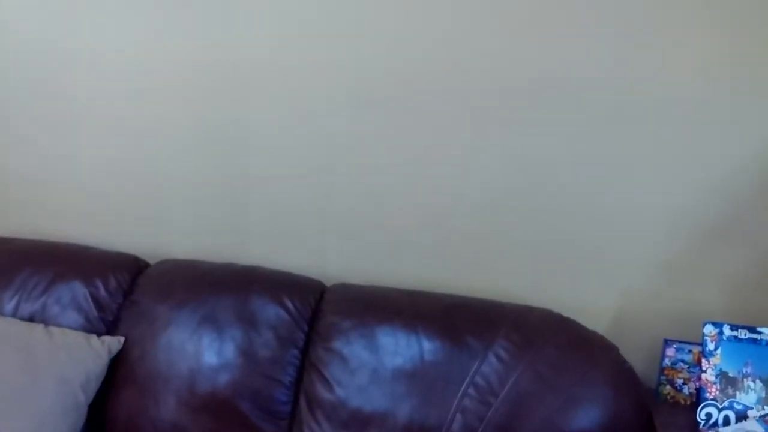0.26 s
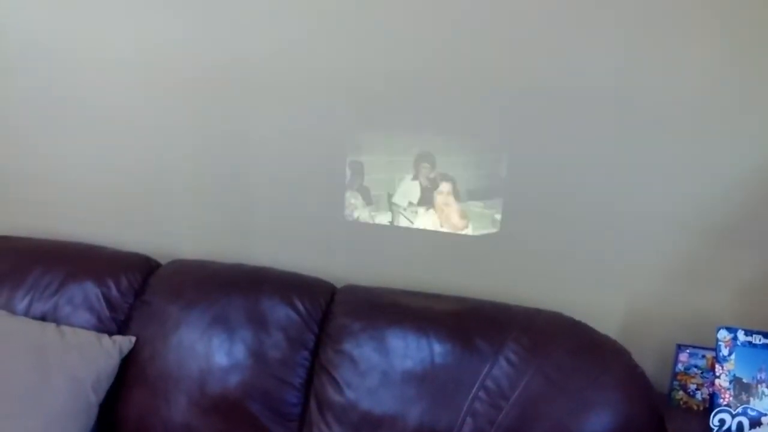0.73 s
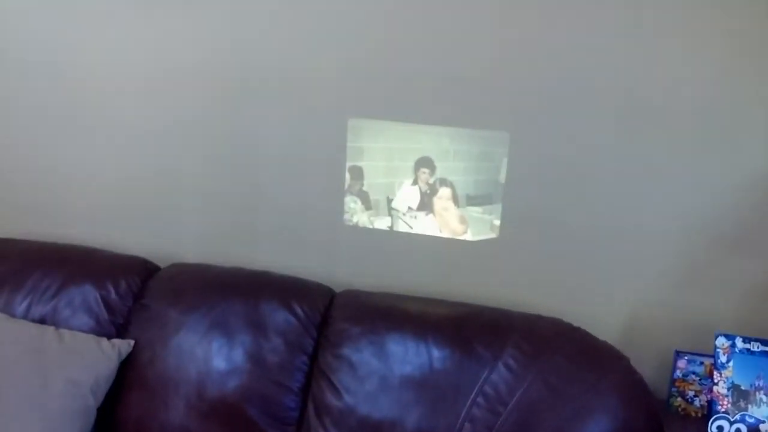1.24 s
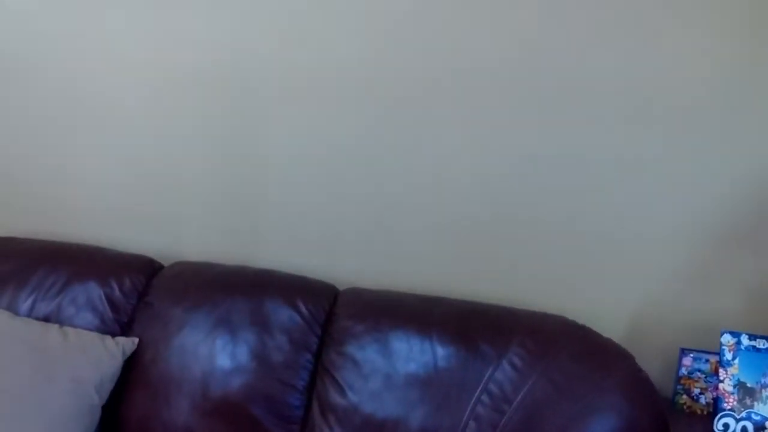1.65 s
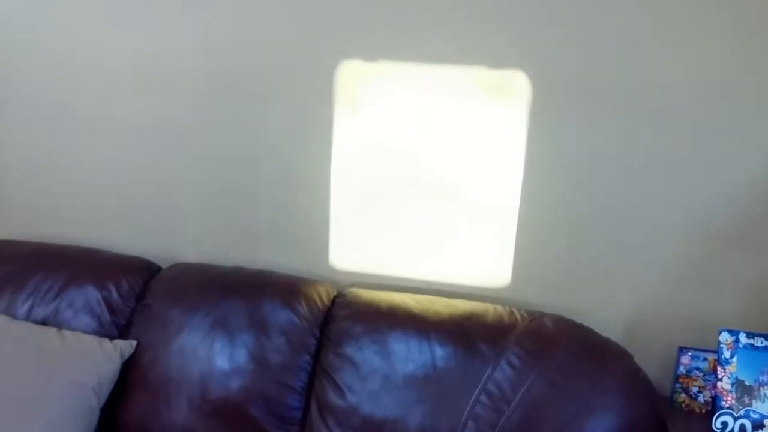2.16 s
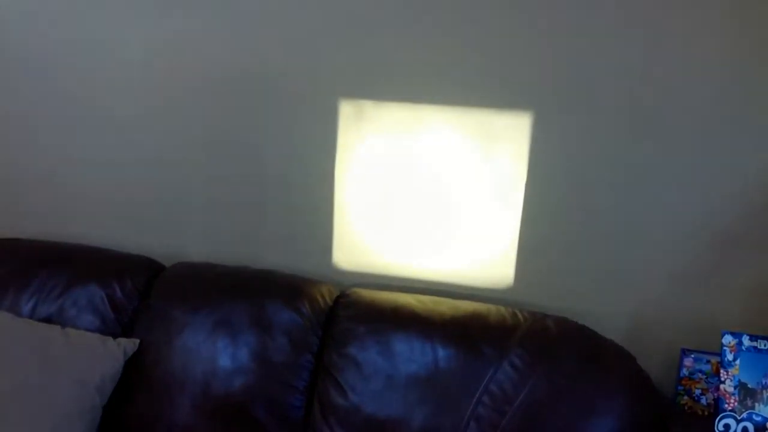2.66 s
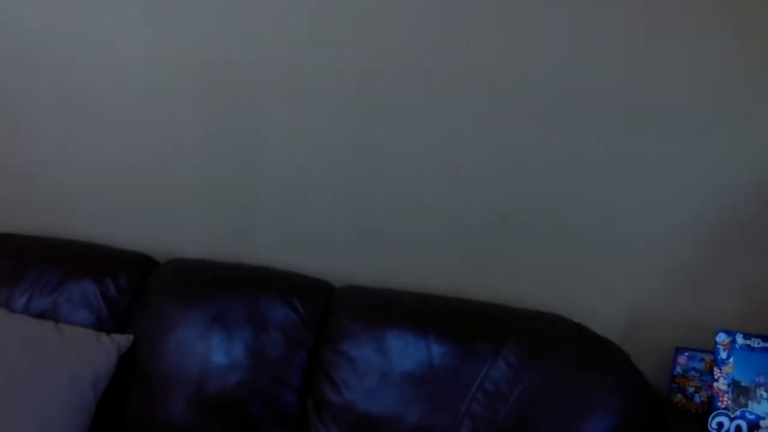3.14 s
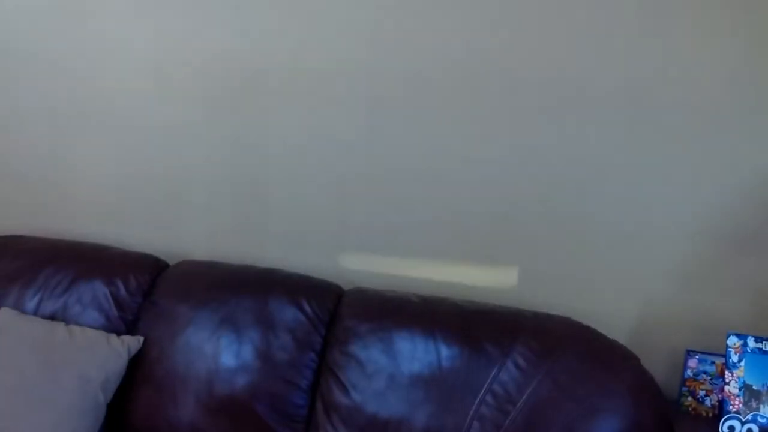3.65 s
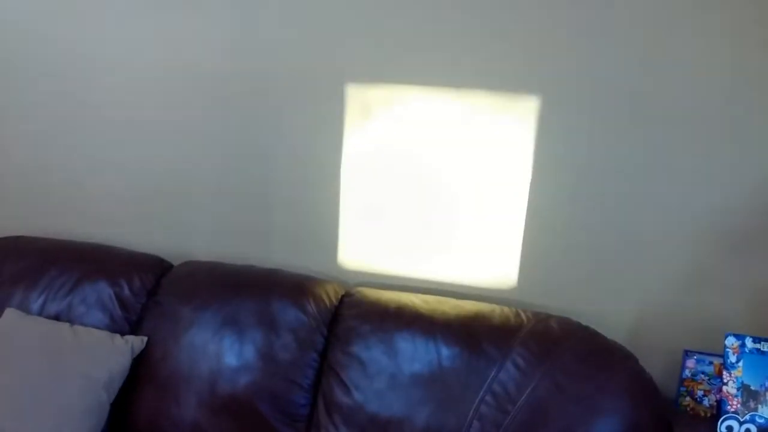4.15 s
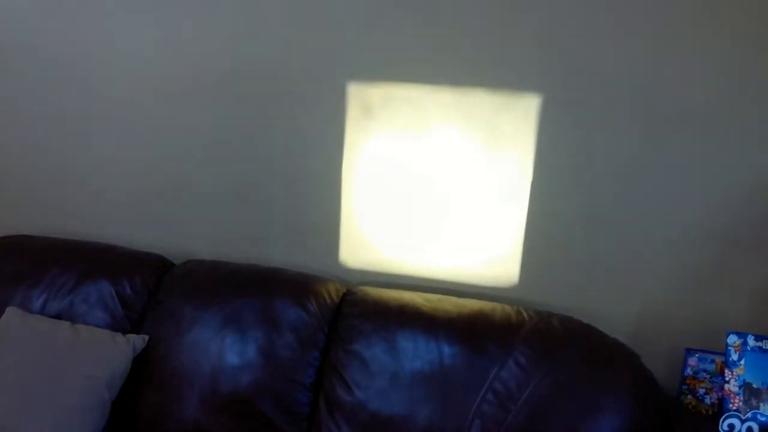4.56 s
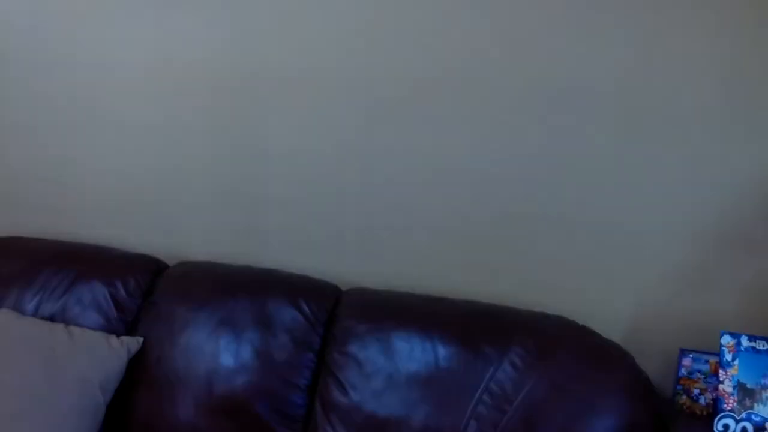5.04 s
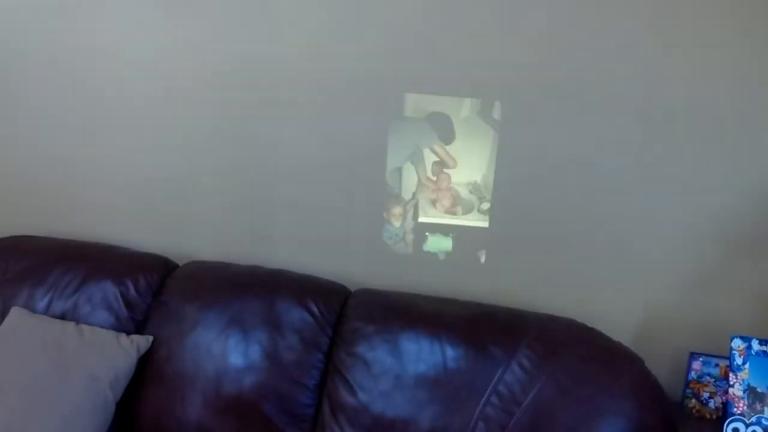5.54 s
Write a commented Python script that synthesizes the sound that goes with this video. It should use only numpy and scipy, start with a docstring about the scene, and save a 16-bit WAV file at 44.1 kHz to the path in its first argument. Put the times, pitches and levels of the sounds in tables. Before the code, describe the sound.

A slide projector works close to a hand-held stereo recorder in a living room, stronger on the left. Its fan rushes steadily, with a faint rapid scuff from the rotor and a low, slightly wavering electrical hum. At about 0.07 seconds a sharp snap starts the first change: metal levers clack and rattle, plastic housing knocks, gears rustle, a slide lands around 0.8, and a soft thud ends it near 1.0. A second cycle starts at 1.4 with the heaviest jolt and a low boom, ending around 2.3. After a pause of fan noise, a third similar clatter runs from 3.0 to 3.95, with a tiny squeak near 3.2. The fourth runs from 4.8 to 5.7, with small woody knocks of loose mounts at 5.4 to 5.6. Then only fan and hum remain. Short, diffuse room echoes surround the bright, dry clacks.

```python
"""Tray slide projector in a living room

A projector close to a hand-held recorder runs four changes, the middle two without a slide. In each, one cam jolts
the stand, runs the gears, works the same levers in order and ends in a soft thud; loose parts keep their own time.
Noise bursts through broad spectra and ringing modes make the clacks; sines make the hum, filtered noise the fan.
Shifting echoes add the room, and the microphones round off the loudest peaks."""
import sys
import numpy as np
from scipy import signal
from scipy.fft import rfft, irfft
from scipy.io import wavfile
from scipy.ndimage import uniform_filter1d

SR = 44100
rng = np.random.default_rng(int(sys.argv[2]) if len(sys.argv) > 2 else 0)


def store_wav(level_fs):
    """Save 16-bit WAV to argv[1]."""
    pcm = np.round(np.clip(np.atleast_2d(level_fs), -1, 1) * 32767)
    wavfile.write(sys.argv[1], SR, pcm.T.astype(np.int16))


N = 255780
T = np.arange(N) / SR

# All levels are relative: each layer's own gain and the microphones follow.
# broad colour of the thin metal levers: f/Hz, level/dB per Hz
METAL_SPECTRUM = [(40, -28), (300, -25), (1000, -5.5), (3000, 0), (4300, -5.5), (5600, -0.5), (8000, -1),
                  (12000, 2.5), (16000, -7.5)]
# broad colour of the plastic housing: f/Hz, level/dB per Hz
HOUSING_SPECTRUM = [(40, -41), (200, -32.5), (450, -5.5), (800, -16), (1300, 7), (1800, 2.5), (2700, 0),
                    (3400, -11.5), (4500, -15.5), (9000, -14)]
# clear modes of the housing: f/Hz, level/dB, t60/s
HOUSING_MODES = [(823, 15, 0.094), (997, 10.5, 0.09), (1196.5, 13.5, 0.12), (1478, 11.5, 0.11),
                 (1860, -37, 0.15), (2366, -44, 0.052), (2350, -10, .05), (2710, -30, 0.029),
                 (3140, -15, 0.087)]
# broad colour of the heavy base: f/Hz, level/dB per Hz
BASE_SPECTRUM = [(40, -30), (130, -8.5), (280, -26), (410, 10.5), (600, 1.5), (900, 4), (2000, -39)]
# clear modes of the base: f/Hz, level/dB, t60/s
BASE_MODES = [(378, -11.5, 0.15), (453, -1, 0.22), (466, 4.5, 0.27), (534, -14, .06), (682, -0.5, 0.16)]
# followers and pawls tick over the cam's lobes: t/s of cam travel, metal level/dB, housing level/dB
CAM_TICKS = [(.063, -6, -40), (.171, -11.5, -64), (.186, -15, -22), (.251, -13, -25.5), (.4372, -7.5, -36),
             (.454, -8, -21), (.6825, -18, -17), (.693, -6.5, -22), (.8105, -9.5, -30), (.94, -19, -32)]
BASE_LAG_S = 0.00494


def mechanism():
    """Clacks and ticks excite thin metal levers, the plastic housing and, a moment later, the heavy base."""
    clacks, ticks = heavy_blows(), on_cam(CAM_TICKS)

    metal = undb(-8.0) * place((s, undb(db) * clatter(t60)) for s, db, _, _, t60 in clacks)
    metal += undb(-12.5) * place((s, undb(db) * blow(t60=0.031, crack_db=-30)) for s, db, _ in ticks)

    # the larger parts take a few milliseconds to build up
    housing = undb(4.0) * place(
        (s, undb(db) * (1 - fade(0.013)) * blow(1.32 * t60, crack_db=-22)) for s, _, db, _, t60 in clacks)
    housing += undb(-6.5) * place((s, undb(db) * blow(t60=0.061, crack_db=-32)) for s, _, db in ticks)
    base = undb(6) * place(
        (s + BASE_LAG_S, undb(db) * (1 - fade(0.018)) * blow(t60=0.082, crack_db=-22))
        for s, _, _, db, _ in clacks)

    clack = through(metal, unit(colour(METAL_SPECTRUM)))
    clatter_of_housing = body(housing, HOUSING_SPECTRUM, HOUSING_MODES, modes_db=-6.5)
    clunk = body(base, BASE_SPECTRUM, BASE_MODES, modes_db=-5)
    return clack + clatter_of_housing + clunk


# one turn of the cam each: t/s, clutch slip before the cam turns/s, pawl snap level/dB,
# starting jolt level/dB, cam force level/dB, closing thud level/dB
CYCLES = [(0.0684, 0.0047, -4.5, -1.5, -0.5, -21.5), (1.3707, 0.0087, -2, 6, 0, -19.5),
          (3.0007, 0.00078, -5, -1.5, 0, -21), (4.7703, 0.0081, -0.5, -4, -0.5, -23.5)]
# whether each cycle brings a slide into the gate: true or false
HAS_SLIDE = [True, False, False, True]
# the clutch bites, then the lifter kicks: t/s after the start, metal level/dB, housing level/dB,
# base level/dB before the jolt is added, chatter t60/s
START_CLACKS = [(0, -7, -25, -33, 0.057), (.0088, 2.5, -19.5, -30, 0.087)]
# the cam throws the index lever, stops the tray and opens the shutter; the cycle's force is added:
# t/s of cam travel, metal level/dB, housing level/dB, base level/dB, chatter t60/s
CAM_CLACKS = [(.3286, -3, -29, -53, 0.12), (.4708, -7.5, -20, -33.5, 0.071), (.79, -9, -23, -45, 0.023)]
# the gate clamp closes on a slide (row 0) or on nothing (row 1); the cycle's force is added:
# metal level/dB, housing level/dB, base level/dB, chatter t60/s
CLAMP_BLOWS = [(-12, -26.5, -52, 0.092), (-1.5, -27.5, -52, 0.1)]
# the loose tray lurches or a slide drops in its own time:
# t/s, metal level/dB, housing level/dB, base level/dB, chatter t60/s
LOOSE_CLACKS = [(0.2738, -2.5, -19, -27, 0.084), (0.7624, -4, -18.5, -53, 0.046),
                (1.5925, -1.5, -16.5, -40, 0.085), (3.2751, -3, -21, -30.5, 0.095),
                (3.2964, -8, -39, -56, .04), (4.8484, -1.5, -22, -34, 0.1), (4.8566, -4.5, -21, -46, .071)]
# cam travel at which the clamp closes: earlier on a slide, later on nothing
CLAMP_FULL_S, CLAMP_EMPTY_S = .7468, .7524


def heavy_blows():
    """Gather all clacks: the jolt drives the base at each start, the cam's force its levers and the clamp."""
    rows = list(LOOSE_CLACKS)
    for (start, slip, _, jolt_db, force_db, _), has_slide in zip(CYCLES, HAS_SLIDE):
        clamp = (CLAMP_FULL_S, *CLAMP_BLOWS[0]) if has_slide else (CLAMP_EMPTY_S, *CLAMP_BLOWS[1])
        for s, metal, housing, base, t60 in START_CLACKS:
            rows.append((start + s, metal, housing, base + jolt_db, t60))
        for s, metal, housing, base, t60 in [*CAM_CLACKS, clamp]:
            rows.append((start + slip + s, metal + force_db, housing + force_db, base + force_db, t60))
    return rows


def at_start(rows):
    """Repeat rows in every cycle, timed from the moment the clutch engages."""
    return [(start + s, *rest) for start, *_ in CYCLES for s, *rest in rows]


def on_cam(rows):
    """Repeat rows in every cycle, timed from the moment the cam begins to turn."""
    return [(start + slip + s, *rest) for start, slip, *_ in CYCLES for s, *rest in rows]


def clatter(t60):
    """A lever strikes and rebounds unevenly, each time with a fresh short crack over its ringing."""
    delays = np.cumsum(.003 + .008 * rng.random(6))
    sizes = undb(2 * rng.standard_normal(6) - 60 * delays / (0.74 * t60))

    def crack():
        return blow(t60=0.018, crack_db=-36)

    rebounds = place((s, size * crack()) for s, size in zip(delays, sizes))[:SR // 2]
    first = undb(1.5) * crack()
    return undb(-2.0) * blow(t60, crack_db=-18) + first + rebounds


# padded knock as the clutch drops out: f/Hz, level/dB, t60/s
CLUTCH_MODES = [(434, -6.5, 0.075), (490, -2.5, 0.048), (593, -5, 0.055), (1010, -8.5, 0.028),
                (2050, -4, 0.015), (2950, 5.5, 0.0084), (3125, 4, 0.012)]
THUD_S = .9495  # cam travel


def clutch():
    """A pawl lifts and snaps in to start the cycle, which ends with a padded knock and a small click."""
    snaps = place((s, undb(db) * blow(t60=0.008, crack_db=-13)) for s, _, db, *_ in CYCLES)
    lifts = place((s - .011, undb(db - 32.5) * blow(t60=0.072, crack_db=-33)) for s, _, db, *_ in CYCLES)

    def thud():
        return ring(CLUTCH_MODES) + undb(-5.0) * blow(t60=0.046, crack_db=-18)

    thuds = place((s + slip + THUD_S, undb(db) * thud()) for s, slip, *_, db in CYCLES)
    return through(snaps + lifts, unit(colour(METAL_SPECTRUM))) + thuds


# a slide lands hard in the gate: t/s, level/dB
LANDINGS = [(0.763, -4.5)]
# ringing of the gate: f/Hz, level/dB, t60/s
GATE_MODES = [(790, -13, .14), (1440, -9, .06), (1840, -5, .04), (2268, 0, .08), (2370, -11, .04)]


def gate():
    """A dropping slide sets the gate's damped modes ringing, with a soft onset."""
    return place((s, undb(db) * (1 - fade(.02)) * ring(GATE_MODES)) for s, db in LANDINGS)


# the mount is jogged as the pawl lifts: t/s after the start, f/Hz, level/dB
START_KNOCKS = [(-.006, 1700, -19)]
# the tray is nudged home, then the lifter bottoms in the gate: t/s of cam travel, f/Hz, level/dB
CAM_KNOCKS = [(.4535, 1620, -27), (.6815, 1442, -18.5)]
# loose mounts knock in the tray and gate: t/s, f/Hz, level/dB
LOOSE_KNOCKS = [(1.589, 1820, -22.5), (5.408, 1680, -16), (5.448, 2180, -23), (5.566, 1627, -18)]


def knocks():
    """A mount rings briefly in two modes while its edges buzz against their neighbours."""
    def knock(hz):
        buzz = resonate(blow(t60=0.08, crack_db=-23), hz, width_hz=310)
        woody = ring([(hz, 0, .04), (1.22 * hz, -3, .04)])
        return woody + undb(10.0) * buzz

    rows = at_start(START_KNOCKS) + on_cam(CAM_KNOCKS) + list(LOOSE_KNOCKS)
    return place((s, undb(db) * knock(hz)) for s, hz, db in rows)


# the index lever squeaks on its way out: t/s of cam travel, f/Hz, level/dB, length/s
CAM_SQUEAKS = [(.254, 2595, -24, 0.017)]
# stray squeaks of dry parts: t/s, f/Hz, level/dB, length/s
STRAY_SQUEAKS = [(0.861, 758, -31.5, 0.048), (3.184, 2860, -29, .014), (4.143, 1397, -39.5, 0.13),
                 (4.549, 1866, -44, 0.079)]
SWISH_S, SWISH_DB = .631, -28.5  # cam travel and level as the lifter slides down its guide


def rubbing():
    """The lifter hisses softly along its guide; dry bearings and levers squeak."""
    def brush():
        return (1 - fade(.05)) * blow(t60=.07, crack_db=-30)

    strokes = place((s, undb(db) * brush()) for s, db in on_cam([(SWISH_S, SWISH_DB)]))
    spectrum = [(1000, -27), (5000, -20.5), (8800, -6.5), (9900, 3), (11000, -12), (16000, -9.0)]
    hiss = undb(9) * through(strokes, unit(colour(spectrum)))

    rows = on_cam(CAM_SQUEAKS) + list(STRAY_SQUEAKS)
    squeaks = place((s, undb(db) * squeak(hz, length_s)) for s, hz, db, length_s in rows)
    return hiss + squeaks


def squeak(hz, length_s):
    """Uneven stick and slip: a rough tone that swells and dies."""
    n = max(int(length_s * SR), 2)
    pitch = hz * (1 + .08 * waver(N, rate_hz=1100)[:n])
    roughness = 1 + 0.55 * waver(N, rate_hz=190)[:n]
    return np.hanning(n) * roughness * np.sin(2 * np.pi * np.cumsum(pitch) / SR)


# load on the gears through one cycle: t/share of the cycle, level/dB
GEAR_LOAD = [(0, -74), (.15, -38.5), (.3, -38.5), (.45, -43.5), (.58, -42.5), (.8, -44.5), (1, -40.5)]
# broad colour of the rustle: f/Hz, level/dB per Hz
GEAR_SPECTRUM = [(100, -17), (300, -5.5), (450, 1.5), (900, 6.5), (1700, 9), (2800, 1.5), (4200, -14),
                 (7000, -3), (10000, -2), (16000, -4)]
CYCLE_S = 0.95


def gears():
    """Gears and sliding tray rustle with dense small contacts for as long as a cycle runs."""
    share, db = np.transpose(GEAR_LOAD)
    load = sum(np.interp((T - s) / CYCLE_S, share, undb(db), left=0, right=0) for s, *_ in CYCLES)
    rustle = load * contacts(N, grain_hz=447.4, scatter_db=3.0)
    return body(rustle, GEAR_SPECTRUM, HOUSING_MODES, modes_db=-9)


# broad colour of the air in the vents: f/Hz, level/dB per Hz
FAN_SPECTRUM = [(25, -17), (60, -9), (170, 3.5), (300, -0.5), (440, 5.5), (570, 3.5), (790, 13), (1150, 4),
                (2000, 3.5), (2900, -2.5), (3700, -12), (4800, -18), (9000, -10.5), (16000, -19)]
ROTOR_HZ, ROTOR_START_S = 16.327, 0.055


def fan():
    """Air rushes through the vents; the drive scuffs once a turn, now louder, now softer."""
    air = undb(-46.5) * through(contacts(N, grain_hz=38.9, scatter_db=-1.45), unit(colour(FAN_SPECTRUM)))
    turns = np.arange(ROTOR_START_S, N / SR, 1 / ROTOR_HZ)
    sizes = undb(-21.5 + 1 * rng.standard_normal(len(turns)))

    def scuff():
        rub = resonate(blow(t60=0.055, crack_db=-10), hz=2866, width_hz=190)
        return unit(resonate(rub, hz=2670, width_hz=670))

    return air + place((s, size * scuff()) for s, size in zip(turns, sizes))


# motor hum before it wavers: f/Hz, level/dB rms
HUM = [(119.9, -56.5), (239.8, -62.5), (359.7, -87), (439.8, -59)]
# boom of the jolted stand: f/Hz, level/dB, t60/s
STAND_MODES = [(143.8, 6.5, 0.56), (162, -10, 1)]
JOLT_DB = -45.5  # each cycle's jolt level is added


def stand():
    """The motor's hum wavers in the stand, which rumbles and booms at each jolt; the right port is softer."""
    hum = sum(undb(db) * np.sqrt(2) * np.sin(2 * np.pi * (hz * T + rng.random())) for hz, db in HUM)
    hum *= undb(.8 * waver(N, rate_hz=9))
    boom = place((s + 0.0155, undb(JOLT_DB + db) * ring(STAND_MODES)) for s, _, _, db, *_ in CYCLES)
    rumble = undb(-56) * resonate(rng.standard_normal(N), hz=75, width_hz=65)
    return np.outer([1, undb(-6.5)], hum + boom + rumble)


def echoes(x, near_db, room_db, size=8192):
    """The moving parts radiate from ever different spots, so the pattern of echoes keeps shifting."""
    padded, window = np.pad(x, size), signal.get_window("hann", size)
    out = np.zeros(N + 2 * SR)
    # overlapping slices, each with fresh echoes
    for i in range(0, N + size, size // 2):
        h = reflections(near_db, near_t60=0.042, room_db=room_db, low_t60=0.42, high_t60=.33)
        out[i:i + size + len(h) - 1] += signal.fftconvolve(padded[i:i + size] * window, h)
    return out[size:size + N]


def reflections(near_db, near_t60, room_db, low_t60, high_t60, size=16384):
    """Quick echoes from nearby furniture, then the tail of the room, whose treble dies first."""
    near, far = rng.standard_normal((2, size))
    low = uniform_filter1d(far, size=5)
    high = far - low
    tail = low * fade(low_t60)[:size] + high * fade(high_t60)[:size]
    tail *= 1 - fade(0.0077)[:size]
    return undb(near_db) * unit(near * fade(near_t60)[:size]) + undb(room_db) * unit(tail)


def body(force, spectrum, modes, modes_db):
    """A struck part: a broad response with a few clear modes standing out."""
    return through(force, unit(colour(spectrum))) + undb(modes_db) * through(force, unit(ring(modes)))


def blow(t60, crack_db, crack_t60=0.0013):
    """A sharp first contact, then the parts chatter to rest."""
    envelope = fade(t60) + undb(crack_db) * fade(crack_t60)
    return contacts(SR // 2, grain_hz=899, scatter_db=2.5) * envelope


def contacts(n, grain_hz, scatter_db):
    """Dense tiny impacts: noise whose strength jumps from one contact to the next."""
    which = (np.arange(n) * grain_hz / SR).astype(int) % n
    x = rng.standard_normal(n) * undb(scatter_db * rng.standard_normal(n))[which]
    return x / np.std(x)


def ring(modes):
    """Response of damped modes; neighbours swing in opposite directions."""
    t = T[:SR // 2]
    return sum((-1) ** k * undb(db) * fade(t60) * np.sin(2 * np.pi * hz * t)
               for k, (hz, db, t60) in enumerate(modes))


def resonate(x, hz, width_hz):
    """One resonance, gain 1 at its centre."""
    return signal.lfilter(*signal.iirpeak(hz, hz / width_hz, fs=SR), x)


def colour(points, size=4096):
    """Causal, minimum-phase response with a spectrum of (Hz, dB) points."""
    hz, db = np.transpose(points)
    grid = np.maximum(np.fft.rfftfreq(size, 1 / SR), 1)
    cepstrum = irfft(np.log(undb(np.interp(np.log(grid), np.log(hz), db))))
    # folding the cepstrum forward puts the energy first
    cepstrum[1:size // 2] *= 2
    cepstrum[size // 2 + 1:] = 0
    return irfft(np.exp(rfft(cepstrum)))


def waver(n, rate_hz):
    """Random levels joined by straight lines."""
    return np.interp(np.arange(n) * rate_hz / SR, np.arange(n), rng.standard_normal(n))


def fade(t60):
    """Half a second of exponential decay."""
    return np.exp(-np.log(1000) * T[:SR // 2] / max(t60, 1 / SR))


def through(x, h):
    """Pass a sound through a response."""
    return signal.fftconvolve(x, h)[:N]


def unit(h):
    """Scale a response so that it keeps the power of white noise."""
    return h / np.sqrt(np.sum(h ** 2))


def place(sounds):
    """Lay (s, sound) pairs on the time line."""
    out = np.zeros(N + SR)
    for s, sound in sounds:
        i = int(np.clip(s * SR, 0, N))
        out[i:i + len(sound)] += sound
    return out[:N]


def undb(db):
    """Decibels to gain."""
    return 10 ** (np.asarray(db) / 20)


# the far port lies in the shadow of the recorder's body: f/Hz, level/dB
SHADOW = [(100, -7), (250, -13), (500, 0), (800, -2.5), (1400, -8.5), (2400, -8), (4400, -3), (8000, -4.5),
          (11000, -10.5), (15000, -11)]
PORT_LAG = 17  # samples


def scene():
    """The projector stands to the left: the right port hears it later, weaker and more diffusely."""
    dry = mechanism() + knocks() + rubbing() + clutch() + gate() + gears() + fan()
    left = dry + echoes(dry, near_db=-5, room_db=-6.5)
    right = undb(-12.5) * np.pad(dry, (PORT_LAG, 0))[:N] + echoes(dry, near_db=-1.5, room_db=-5.5)
    # long waves, echoes included, are nearly the same at both ports
    alike = undb(-1.5) * np.pad(left, (PORT_LAG, 0))[:N]
    right += signal.sosfiltfilt(signal.butter(2, 480, fs=SR, output="sos"), alike - right)
    return np.array([left, through(right, colour(SHADOW))]) + stand()


def port(x, hz, width_hz, boost_db):
    """The small cavity in front of a microphone rings in the treble."""
    return x + undb(boost_db) * resonate(x, hz, width_hz)


def record(dry):
    """Each port adds its resonance; the deepest bass is cut, loud peaks saturate and the top is cut."""
    left = port(dry[0], hz=9570, width_hz=900, boost_db=14.0)
    right = port(dry[1], hz=8660, width_hz=580, boost_db=15)
    bass_cut = signal.butter(2, 42, "highpass", fs=SR, output="sos")
    heard = signal.sosfilt(bass_cut, np.array([left, right]))
    ceiling = .92
    saturated = ceiling * np.tanh(heard / ceiling)
    top_cut = signal.ellip(12, .2, 80, 16000, fs=SR, output="sos")
    return signal.sosfilt(top_cut, saturated)


dry = scene()
out = record(dry)
store_wav(out)
```